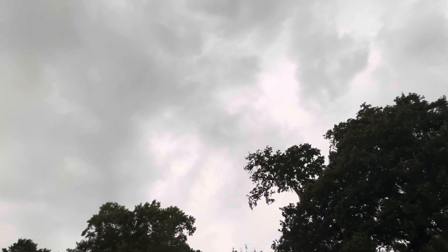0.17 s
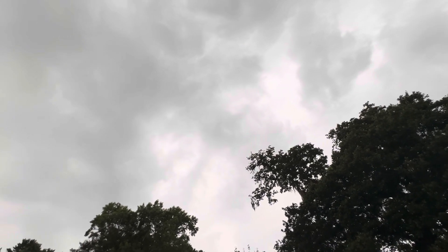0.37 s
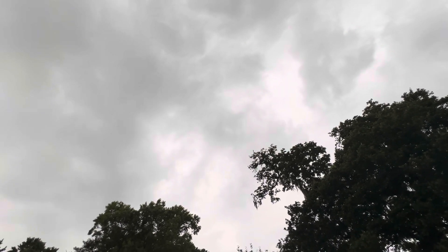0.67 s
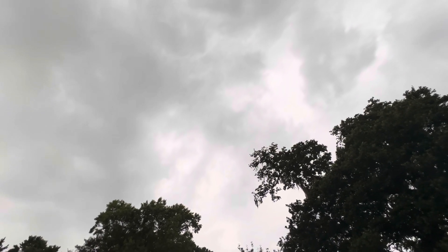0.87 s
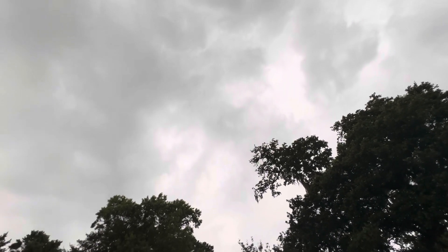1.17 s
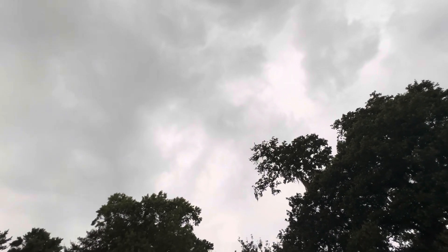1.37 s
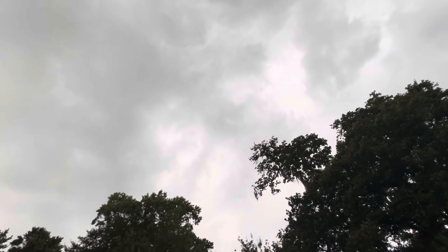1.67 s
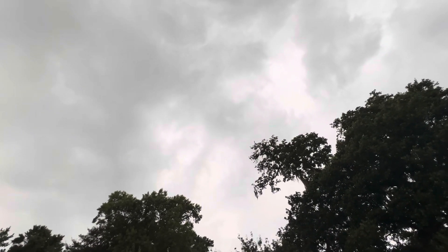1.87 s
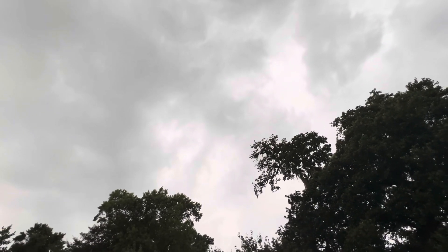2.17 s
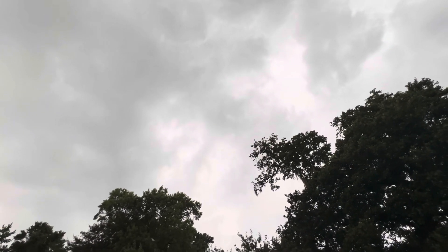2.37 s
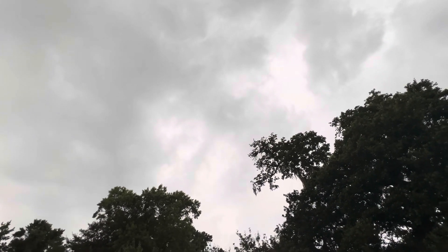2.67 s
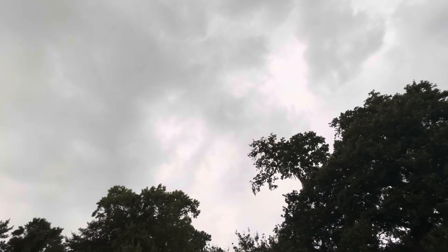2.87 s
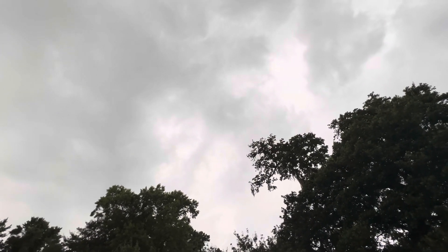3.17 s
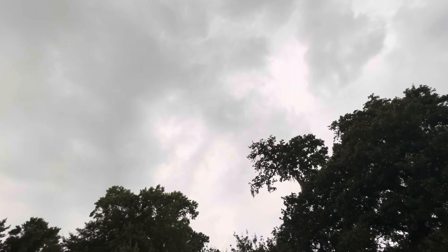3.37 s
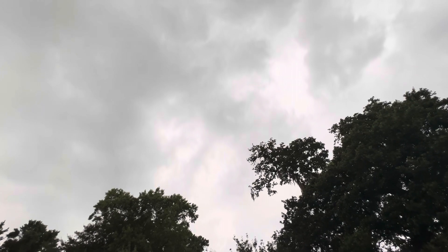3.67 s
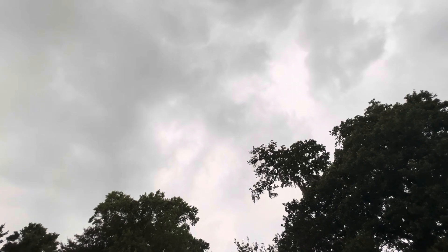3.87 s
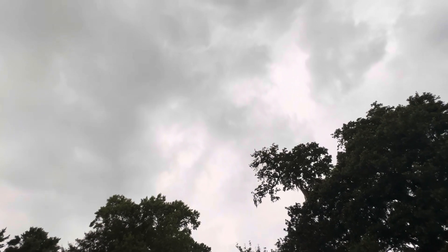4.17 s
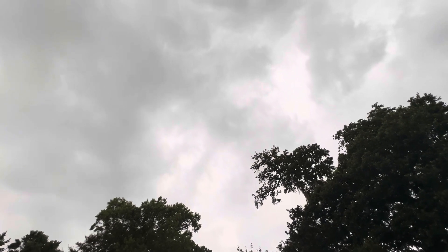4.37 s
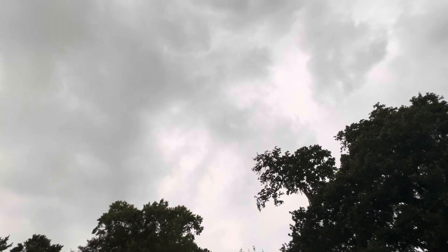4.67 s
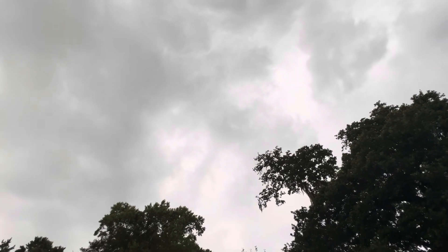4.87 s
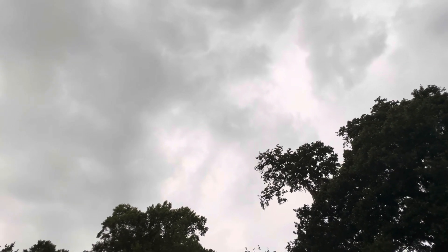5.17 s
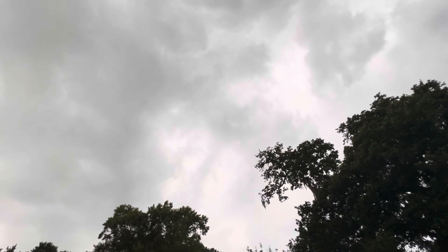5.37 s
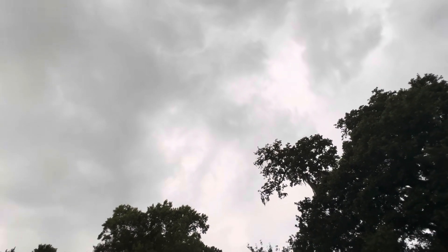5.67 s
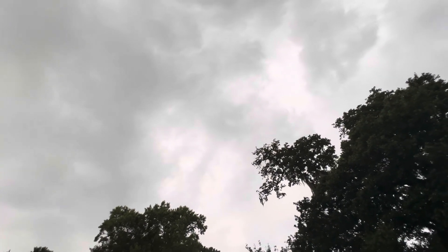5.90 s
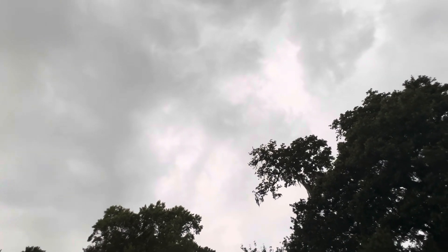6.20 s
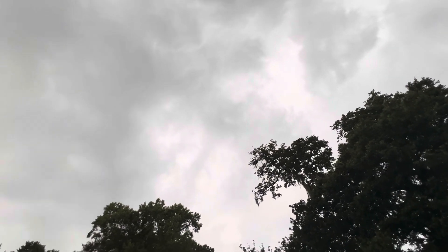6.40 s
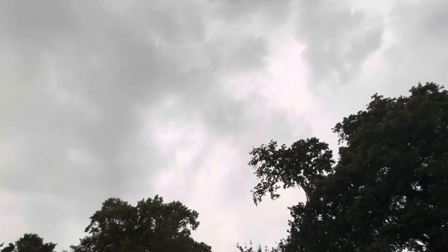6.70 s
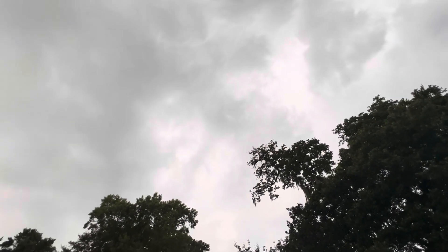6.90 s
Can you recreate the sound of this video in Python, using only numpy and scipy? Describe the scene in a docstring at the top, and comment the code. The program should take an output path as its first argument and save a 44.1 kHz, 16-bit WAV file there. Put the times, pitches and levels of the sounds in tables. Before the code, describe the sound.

Open air among leafy trees under heavy cloud, heard in wide stereo. From 0 s distant thunder rolls, deep and dulled, strongest in the first second, then muttering in overlapping thuds and rising again around 5.9-6.5 s, over a faint low drone and soft leaf wash. Far cicadas hiss steadily, brighter on the right, with two high crickets chirping four or five times a second, drifting in and out of step. Small raindrops tick on leaves throughout, with clear taps at 0.9, 2.9, 3.3, 4.2 and 4.95 s and a crackling cluster at 6.4 s. A thin far whistle swells faintly until about 2.8 s. Bird chips fall at 0.4, 3.9 and 5.7 s. A nearer cicada surges at 2.3, 2.7 and 3.1 s, then from 4.2 s sustains a raspy, sizzling buzz to the end at about 7 s. One soft husky squeak rises at 3.2 s.

```python
"""From the start, distant thunder rolls in overlapping peals, shocks dulled by air, above a low drone and leaf wash.
Far cicadas hiss as merged noise and narrow voices; two crickets chirp by wing strokes, in and out of step.
Raindrops ring the modes of nearby leaves, brief bird chips slur down and a thin far whistle swells.
A nearer cicada, built from overtones of its tymbal clicks, then winds up in three surges and holds its buzz.
Bigger drops scatter in short crackles from its second surge on, and one husky squeak rises soon after."""
import sys
import numpy as np
from scipy import signal
from scipy.fft import rfft, irfft
from scipy.io import wavfile
from scipy.ndimage import uniform_filter1d

SR = 44100
rng = np.random.default_rng(int(sys.argv[2]) if len(sys.argv) > 2 else 0)


def unload_audio(sound):
    """Save the sound as a 16-bit wav file, at the path given as the first command line argument."""
    columns = np.transpose(np.atleast_2d(sound))
    # keep every value between -1 and 1, then stretch to whole-number steps
    steps = np.round(np.clip(columns, -1, 1) * 32767)
    wavfile.write(sys.argv[1], SR, steps.astype(np.int16))


N = 310464
TIME = np.arange(N) / SR
FREQ = np.fft.rfftfreq(N, 1 / SR) + 1e-3  # the offset keeps logarithms finite


def undb(db):
    """Amplitude ratio: 20 dB is a factor of ten."""
    return 10 ** (np.asarray(db) / 20)


def unit(x):
    """Normalisation to an rms amplitude of 1."""
    return x / np.sqrt(np.mean(x ** 2))


def curve(rows, axis=1):
    """Linear interpolation in time of one column of a table."""
    rows = np.asarray(rows)
    return np.interp(TIME, rows[:, 0], rows[:, axis])


def colour(x, points):
    """Spectral shaping by (frequency_hz, gain_db) points, falling steeply outside them."""
    hz, db = np.transpose(points)
    octaves_outside = np.abs(np.log2(FREQ / np.clip(FREQ, hz.min(), hz.max())))
    gain_db = np.interp(np.log(FREQ), np.log(hz), db) - 40 * octaves_outside
    return irfft(rfft(x) * undb(gain_db), N)


def resonate(x, hz, width_hz):
    """Damped resonance with gain 1 at its centre."""
    return signal.lfilter(*signal.iirpeak(hz, hz / width_hz, SR), x)


def walk(rate):
    """Slow random modulation, rms 1: levels held 1 / rate s and smoothed twice."""
    k = int(SR / rate)
    steps = np.repeat(rng.standard_normal(N // k + 1), k)
    return unit(uniform_filter1d(uniform_filter1d(steps, k), k)[:N])


def surround(pair, wide_hz, spread=1.4):
    """Diffuse-field coherence: long waves reach both ears alike, short ones do not."""
    mid, side = rfft(pair)
    ratio = FREQ / wide_hz
    share = ratio ** 2 / np.abs(1 - ratio ** 2 + 1j * ratio / spread)
    both = mid + side * share * np.array([[1], [-1]])
    return irfft(both / np.sqrt(1 + share ** 2), N)


def foliage(x, t60, wet_db):
    """Diffuse reverberation: direct sound and a decaying tail thrown back by trunks and leaves."""
    t = TIME[:SR // 2]
    tail = rng.standard_normal((2, len(t))) * undb(-60 * t / t60)
    tail *= undb(wet_db) / np.sqrt(np.sum(tail ** 2, axis=1, keepdims=True))
    tail[:, 0] += 1  # direct sound
    heard = signal.fftconvolve(x[None], tail, axes=1)[:, :N]
    return heard / np.sqrt(1 + undb(wet_db) ** 2)


def swell(start, rise_s, hold_s, fade_s):
    """Envelope: linear rise, hold, then exponential decay with time constant fade_s."""
    t = TIME - start
    return np.clip(t / rise_s, 0, 1) * np.exp(-np.maximum(t - rise_s - hold_s, 0) / fade_s)


def swells(rows, axis=4):
    """Incoherent addition: overlapping swells add in power, at the levels of one column."""
    return np.sqrt(sum((undb(row[axis]) * swell(*row[:4])) ** 2 for row in rows))


def thunder(claps_per_s=420, scatter_db=0.5, steady_s=0.082, split_hz=105, wide_hz=390, boom_db=0.0, upper_db=0):
    """Delayed arrival: shocks from all along the channel overlap as thuds, dulled by miles of air."""
    # spectrum left by the long path through air: frequency_hz, gain_db
    roll_colour = [(25, -49), (40, -16), (50, -14.5), (62, 0.5), (76, -3), (95, -3.5), (122, -3),
                   (175, -9.5), (205, -9), (300, -20.5), (400, -24), (520, -47)]
    # peals, one for each stretch of the lightning channel:
    # start_s, rise_s, hold_s, fade_s, boom_db, upper_rumble_db
    peals = [(0, 0.023, 0.04, 0.08, -42, -37), (.03, 0.07, 0.26, 0.37, -30.7, -37),
             (.42, 0.022, 0.033, 0.41, -52, -37.5), (.74, 0.043, 0.027, 0.025, -41.5, -39),
             (.9, 0.067, 0.24, .15, -47, -53), (1.29, 0.047, 0.077, 0.23, -44, -42.5),
             (1.53, 0.048, 0.059, 0.17, -41, -41.5), (1.72, 0.035, .1, 0.45, -53, -46),
             (2.18, 0.11, 0.074, 0.095, -45.5, -53), (2.35, 0.36, .4, 0.55, -47, -47.5),
             (3.17, 0.025, 0.074, 0.059, -43, -46.5), (3.31, 0.037, 0.047, 0.032, -51, -43.5),
             (3.51, 0.023, 0.032, 0.14, -40.5, -51), (3.69, 0.04, 0.14, 0.61, -45, -48.5),
             (4.18, 0.067, .08, 0.26, -45.5, -56), (4.85, 0.21, 0.099, 0.071, -49.5, -62),
             (5.84, 0.11, 0.27, 0.39, -41, -47), (6.27, 0.084, 0.036, 0.054, -38, -43),
             (6.42, 0.036, 0.09, 0.13, -39, -49.5)]
    mutter_db = -53  # the far echoes that never quite die between peals
    lurch_db = 1

    arrivals = rng.random((2, N)) < claps_per_s / SR
    strengths = undb(scatter_db * rng.standard_normal((2, N)))
    shocks = arrivals * rng.choice([-1, 1], (2, N)) * strengths
    rumble = surround(colour(shocks, roll_colour), wide_hz)
    # far stretches of the channel send only a boom; nearer ones keep their upper rumble
    boom = irfft(rfft(rumble) / (1 + (FREQ / split_hz) ** 8), N)
    out = 0
    for part, loud, db in ((boom, swells(peals), boom_db), (rumble - boom, swells(peals, axis=5), upper_db)):
        power = uniform_filter1d(np.mean(part ** 2, axis=0), int(steady_s * SR))
        steady = part / np.sqrt(power)
        out = out + steady * np.hypot(loud, undb(mutter_db)) * undb(db + lurch_db * walk(14))
    return out


def drops(push_s=0.0013, leaf_db=7, spatter_db=7, spray_db=8, small_per_s=9, small_db=-61):
    """Impulsive excitation: a drop rings the leaf's modes while water spatters; tiny ones fall between."""
    # drops on leaves, levels before the common gains: start_s, leaf_db, pitch_hz, spatter_db, fine_spray_db
    falls = [(0.1515, -53, 890, -47.5, -53), (0.358, -50.5, 1430, -54, -66),
             (0.66, -49, 1100, -46.5, -46.5), (0.729, -53, 905, -56, -67), (0.883, -33.5, 1564, -46.5, -54),
             (0.887, -37, 1500, -58, -63), (0.889, -42, 640, -58, -68), (1.36, -49, 1340, -57, -54),
             (1.378, -45, 710, -62, -66), (1.629, -53, 1070, -50.5, -66), (2.338, -48, 760, -52, -58),
             (2.901, -48, 1020, -51, -61), (2.906, -47, 617, -50, -65), (2.913, -45, 830, -62, -65),
             (3.019, -51, 1940, -63, -68), (3.286, -44, 900, -53, -66), (3.291, -45, 1750, -43, -55),
             (3.964, -64, 1380, -52, -49), (4.196, -43.5, 1014, -52.5, -53.5),
             (4.198, -45.5, 1610, -58, -62), (4.251, -56, 1620, -51, -52), (4.946, -40.5, 1166, -59, -60),
             (4.953, -45, 900, -65, -64), (5.297, -40.5, 1390, -63, -59), (5.511, -47, 860, -64, -54),
             (5.912, -45.5, 1210, -60, -54), (6.371, -46, 1210, -51, -57),
             (6.4355, -32.5, 1620, -49, -44.5), (6.4405, -40, 1254, -42, -50),
             (6.4435, -37, 1740, -46, -49), (6.449, -40, 1270, -50, -53), (6.463, -40, 1700, -45, -68)]
    # modes of a struck leaf: pitch_multiple, t60_s, level_db
    leaf_modes = [(.42, 0.015, -8), (.78, 0.02, -10.5), (1, 0.017, 2.5), (1.15, 0.022, -9),
                  (1.55, .016, -11.5), (2.1, 0.019, -22)]

    leaves, spatter, spray = np.zeros((3, N + SR))
    t = TIME[:SR // 10]
    draws = rng.random((int(small_per_s * TIME[-1]), 3))
    small = [(when * TIME[-1], small_db + 6 * size, 750 + 1300 * pitch, small_db + 3.0, small_db - 14)
             for when, size, pitch in draws]
    # a sharp snap, then the droplets fly apart
    splash = (np.exp(-t / .0035) + .35 * np.exp(-t / .011)) * (1 - np.exp(-t / .0005))
    for at, db, hz, coarse_db, fine_db in list(falls) + small:
        leaf = np.zeros(len(t))
        for ratio, t60, mode_db in leaf_modes:
            decay = np.exp(-np.log(1000) * t / t60)
            leaf += undb(mode_db) * decay * np.sin(2 * np.pi * (ratio * hz * t + rng.random()))
        span = slice(int(at * SR), int(at * SR) + len(t))
        leaves[span] += undb(db + leaf_db) * leaf * (1 - np.exp(-t / push_s))
        spatter[span] += undb(coarse_db + spatter_db) * splash * rng.standard_normal(len(t))
        spray[span] += undb(fine_db + spray_db) * splash * rng.standard_normal(len(t))
    water = colour(spatter[:N], [(700, -20), (1600, 3.0), (2500, 4.0), (4500, 1.5)])
    water += colour(spray[:N], [(4500, 7.0), (6500, 3), (9000, -10)])
    return foliage(leaves[:N] + water, .07, -6)


def scatters(per_s=1600, scatter_db=4.5, gain_db=0, wet_db=-6):
    """Random impulse train: big drops burst into droplets that crackle through the lower leaves."""
    # bursts of droplets: start_s, rise_s, hold_s, fade_s, level_db
    bursts = [(2.9, 0.007, .015, 0.04, -60), (3.288, 0.0046, .008, 0.022, -51),
              (5.49, .02, 0.018, 0.054, -52.5), (5.66, 0.097, .2, 0.37, -60),
              (6.362, 0.0066, 0.0086, 0.026, -46), (6.434, 0.0026, 0.014, 0.031, -42.5),
              (6.52, 0.026, 0.069, 0.06, -55.5)]
    # spectrum of the crackle: frequency_hz, gain_db
    crackle_colour = [(450, -5.5), (800, -1), (1200, 1), (1700, -2), (2300, -8.5), (3500, -4),
                      (6000, -13.5), (8500, -10.5)]

    arrivals = rng.random(N) < per_s / SR
    droplets = arrivals * rng.choice([-1, 1], N) * undb(scatter_db * rng.standard_normal(N))
    crackle = unit(colour(droplets, crackle_colour)) * swells(bursts)
    return undb(gain_db) * foliage(crackle, 0.76, wet_db)


def cicada(body_db=1.4, body_follow=0.4, ribs_db=1.5, throb=0.11):
    """Source and resonator: tymbal clicks drive the hollow abdomen; effort adds a bright rib sizzle."""
    # tymbal buckling: time_s, click_rate_hz
    tymbal = [(2.4, 146), (2.8, 149.3), (3.3, 148.9), (3.9, 148.8), (4.1, 145.8), (4.45, 145.5),
              (4.75, 144.5), (5.1, 144.6), (5.35, 144.2), (5.9, 144.4), (7, 144.1)]
    # resonance of the hollow abdomen: frequency_hz, gain_db
    abdomen = [(3900, -20), (4170, -9), (4330, -7.5), (4470, -8), (4620, -5), (4770, -5), (4930, -2),
               (5060, -2), (5190, -1), (5360, -4), (5500, -14)]
    # resonance of the tymbal ribs: frequency_hz, gain_db
    ribs = [(7900, -27.5), (9000, 7.5), (9500, 3.5), (9950, 3.5), (10300, 3.5), (10900, -6), (12100, -23),
            (13200, -2.5), (14300, -14), (15000, -7), (15700, -22)]
    # moments when one overtone sings out: start_s, rise_s, hold_s, fade_s, lift_db, overtone_number
    sing_outs = [(2.74, .08, .06, .05, 5, 34), (3.1, .15, .5, .15, 4.5, 28), (3.28, .1, .42, .1, 8.5, 34),
                 (3.38, .12, .33, .08, 7.5, 36), (4.12, .12, .15, .12, 9, 34),
                 (4.18, .12, .15, .12, 5.5, 30), (4.6, .15, .4, .07, 8.5, 32), (5.15, .1, .15, .1, 6.5, 36),
                 (5.6, .08, .12, .08, 6.5, 36), (5.78, .05, .04, .03, 7, 35), (5.7, .3, .9, .2, 4.5, 32),
                 (6.62, .06, .06, .04, 4.5, 35), (6.8, .08, .15, .08, 8.5, 36)]
    # surges, the last sustained, before the body and rib gains: start_s, rise_s, hold_s, fade_s, level_db
    surges = [(2.29, 0.11, .02, 0.14, -55.5), (2.71, 0.12, .03, 0.21, -54.5), (3.1, 0.22, 0.44, 0.6, -54),
              (4.17, 0.32, 3.6, 0.15, -54.5)]
    # wind in the leaves makes overtones fade (dB) and waver (cycles), and the body's buzz flutter (dB)
    fade_db, waver, flutter_db = 2.5, .075, 1.3
    skirt_db = -13  # share of each overtone that the leaves scatter into a rough skirt
    rib_tone_db = -5  # rib overtones relative to the rasp

    rate = curve(tymbal)
    cycles = np.cumsum(rate * (1 + .001 * walk(18))) / SR

    def overtone(order):
        """Multipath propagation: each overtone swells and wavers alone through the moving leaves."""
        phase = 2 * np.pi * (order * cycles + waver * walk(70) + rng.random((2, 1)))
        skirt = (walk(110) * np.sin(phase) + walk(110) * np.cos(phase)) / np.sqrt(2)
        return undb(fade_db * walk(26)) * (np.sin(phase) + undb(skirt_db) * skirt)

    body = np.zeros((2, N))
    for order in range(27, 38):
        ring_db = np.interp(order * rate, *np.transpose(abdomen))
        lift_db = sum(row[4] * swell(*row[:4]) for row in sing_outs if round(row[5]) == order)
        body += undb(ring_db + lift_db) * overtone(order)
    body = unit(body * undb(flutter_db * walk(30)))

    rib_tones = unit(sum(overtone(order)[0] for order in range(66, 72)))
    rasp = rng.standard_normal(N) * (1 + throb * np.cos(2 * np.pi * cycles))
    sizzle = unit(colour(rasp, ribs)) + undb(rib_tone_db) * unit(colour(rib_tones, ribs))
    sizzle = sizzle * undb(1.2 * walk(25))
    # a copy delayed 12 samples spreads the sizzle between left and right
    sizzle = np.array([sizzle, np.roll(sizzle, 12)])

    loud = swells(surges)
    effort = loud / loud.max()
    buzz = undb(body_db) * body * effort ** body_follow
    return loud.max() * (buzz + undb(ribs_db) * sizzle * effort)


def cricket(chirps, hz, stroke_hz, length_s, sag, wet_db, gain_db):
    """Resonant stridulation: wing strokes gate one ringing pitch, which sags as each stroke slows."""
    grass_t60_s = .12  # how long the song lingers in the foliage
    loud, pitch = np.zeros(N), np.full(N, float(hz))
    for (at, db), (tune, shift) in zip(chirps, rng.standard_normal((len(chirps), 2))):
        near = np.abs(TIME - at) < length_s / 2
        t = TIME[near] - at
        stroke = (t * stroke_hz + shift) % 1
        chirp_shape = np.sqrt(np.abs(np.cos(np.pi * t / length_s)))
        loud[near] = undb(db) * np.sin(np.pi * stroke) ** 2 * chirp_shape
        pitch[near] = hz * (1 + 0.00186 * tune - sag * (stroke - .5))
    song = loud * np.sin(2 * np.pi * np.cumsum(pitch * (1 + 0.00396 * walk(500))) / SR)
    return undb(gain_db) * foliage(song, grass_t60_s, wet_db)


def low_cricket():
    """Amplitude-gated tone: the lower wing resonance, chirp by chirp."""
    # chirps, levels before the common gain: centre_s, level_db
    chirps = [(.126, -61), (.319, -60), (.502, -55.5), (.70, -54.5), (.903, -58), (1.143, -58),
              (1.337, -59), (1.513, -60), (1.739, -62), (1.932, -57), (2.139, -56.5), (2.395, -56.5),
              (2.59, -58), (2.80, -55.5), (3.015, -55.5), (3.228, -54.5), (3.438, -53), (3.655, -53.5),
              (3.929, -60), (4.164, -57.5), (4.405, -59), (4.633, -58), (4.889, -61), (5.12, -59),
              (5.346, -57), (5.577, -62), (5.789, -59), (5.985, -60), (6.301, -57), (6.55, -56),
              (6.798, -58)]
    return cricket(chirps, hz=6957, stroke_hz=44.3, length_s=0.0935, sag=0.026, wet_db=-2.5, gain_db=8.5)


def chirp_times(runs, sway_s=0.0073, scatter_db=1.0):
    """Jittered periodicity: an even beat in each run, swaying in time and strength (centre_s, level_db)."""
    beats = [(at, db) for first, end, period, db in runs for at in np.arange(first, end, period)]
    return np.array(beats) + rng.standard_normal((len(beats), 2)) * [sway_s, scatter_db]


def high_cricket():
    """Amplitude-gated tone: the higher wing resonance, in nearly periodic runs of chirps."""
    # runs of chirps: first_chirp_s, end_s, period_s, level_db
    runs = [(.22, .75, 0.2, -55), (.89, 2.15, 0.22, -55.5), (2.39, 3.75, .213, -54.5),
            (3.965, 7.1, 0.23, -55)]
    chirps = chirp_times(runs)
    return cricket(chirps, hz=7350, stroke_hz=41.6, length_s=.12, sag=0.038, wet_db=1, gain_db=0.0)


def chorus(level_db=-52, voices_db=-21.0, lead_hz=5360, lead_db=-16):
    """Incoherent superposition: far cicadas merge into hiss; voices rise and sink, one holds its note."""
    # spectrum of the far cicadas: frequency_hz, gain_db
    chorus_colour = [(3300, -11.5), (4100, -2.5), (4600, 0.5), (5150, 4), (5400, -0.5), (5700, -5),
                     (7700, -11.5), (8800, -8), (9400, -13.5), (10400, -4), (11200, -11.5), (12200, -72),
                     (13800, -26), (15500, -27)]

    hiss = unit(colour(rng.standard_normal((2, N)), chorus_colour))
    for hz in np.linspace(4450, 5350, 7):
        voice = unit(resonate(resonate(rng.standard_normal((2, N)), hz, 65), hz, 65))
        hiss = hiss + voice * undb(voices_db + 4 * walk(12))
    lead_cycles = np.cumsum(lead_hz + 10 * walk(60)) / SR
    lead = np.sin(2 * np.pi * (lead_cycles + rng.random((2, 1))))
    hiss = hiss + lead * undb(lead_db + 2.1 * walk(3.2))
    return hiss * undb(level_db + 0.91 * walk(0.8) + .5 * walk(25.07))


def far_crickets(level_db=-63):
    """Narrow-band noise: more crickets further off blur into a trembling band."""
    band_colour = [(6600, -31), (6950, -15.0), (7150, 12.0), (7450, 7.0), (7650, -18.0)]
    band = colour(rng.standard_normal((2, N)), band_colour)
    return unit(band) * undb(level_db + 2.0 * walk(11))


def birds():
    """Frequency glide: each chip is a brief husky note that slurs down and fades among the trees."""
    # chip notes, levels before a common gain:
    # start_s, final_pitch_hz, downward_slur_hz, huskiness (fraction of pitch), level_db, fade_s
    chips = [(.400, 6500, 500, .035, -47.5, 0.028), (3.915, 6000, 200, .03, -52, 0.04),
             (5.718, 2900, 450, .025, -45, 0.011)]
    slur_s = 0.0042  # how quickly a chip drops to its final pitch

    song = np.zeros(N)
    for at, hz, slur_hz, husk, db, fade_s in chips:
        t = np.maximum(TIME - at, 0)
        pitch = (hz + slur_hz * np.exp(-t / slur_s)) * (1 + husk * walk(1500))
        note = np.sin(2 * np.pi * np.cumsum(pitch) / SR)
        song += undb(db + 2.5) * note * (1 - np.exp(-t / 0.0016)) * np.exp(-t / fade_s)
    return foliage(song, 0.16, -1)


def squeak(start_s=3.222, length_s=0.067, from_hz=1570, to_hz=1720, level_db=-56, rough=0.028):
    """Frequency modulation: one soft squeak glides up, random pitch shifts making it slightly husky."""
    along = np.clip((TIME - start_s) / length_s, 0, 1)
    pitch = (from_hz + (to_hz - from_hz) * along ** 2) * (1 + rough * walk(400))
    tone = np.sqrt(np.abs(np.sin(np.pi * along))) * np.sin(2 * np.pi * np.cumsum(pitch) / SR)
    return undb(level_db) * foliage(tone, 0.25, -13)


def whistle(hz=1959, gain_db=-4, waver_db=-0.5):
    """Amplitude modulation: a thin, faint, nearly pure tone comes and goes far away."""
    # swells, levels before the common gain: start_s, rise_s, hold_s, fade_s, level_db
    rises = [(-.05, .05, .15, 0.2, -64), (.5, 0.13, 0.24, .08, -61.5), (1.82, 0.11, 0.044, 0.11, -62),
             (2.45, 0.068, 0.22, 0.085, -61.5)]
    floor_db = -68.5  # between swells, before the common gain
    loud = np.hypot(swells(rises), undb(floor_db + waver_db * walk(3.7)))
    return np.sin(2 * np.pi * np.cumsum(hz + 4 * walk(25.07)) / SR) * loud * undb(gain_db)


def drone(hz=57, width_hz=9, level_db=-53):
    """Resonant filtering: twice-resonated noise makes a faint, unsteady low drone under the thunder."""
    tone = resonate(resonate(rng.standard_normal(N), hz, width_hz), hz, width_hz)
    return unit(tone) * undb(level_db)


def air(level_db=-52.0):
    """Broadband diffuse noise: the soft wash of leaves and far country."""
    # spectrum of open air and foliage: frequency_hz, gain_db
    air_colour = [(45, 10), (62, -6), (90, 0), (200, 8), (330, 4), (500, 2.5), (800, -0.5), (1150, -0.5),
                  (1700, -3), (2400, -6.5), (3500, -8.5), (6300, -27.5), (7900, -34), (11000, -26.5)]
    wash = surround(colour(rng.standard_normal((2, N)), air_colour), 503)
    return unit(wash) * undb(level_db + .25 * walk(1.9) + .9 * walk(14))


def scene():
    """Superposition: thunder from a little to the left, with air, insects, birds and drops."""
    left, right = thunder()
    storm = np.array([left, np.pad(right, (10, 0))[:N]])  # 10 samples later on the right
    low, high = low_cricket(), high_cricket()
    weather = storm + drone() + air()
    insects = chorus() + cicada() + low + high + far_crickets()
    rain = drops() + scatters()
    return weather + insects + rain + squeak() + birds() + whistle()


def record(dry):
    """Interchannel level difference: the right hears more upper middle range; the top is cut."""
    # the two microphones: frequency_hz, left_minus_right_db
    ears = [(60, 1), (110, 1.5), (200, 1), (380, -0.5), (700, 1), (1290, -4), (2380, -2.5), (4400, -12),
            (8120, -3.5), (15000, 2.5)]
    top_hz = 15500
    hz, db = np.transpose(ears)
    tilt_db = np.interp(np.log(FREQ), np.log(hz), db) * np.array([[.5], [-.5]])
    mean_power = np.mean(undb(tilt_db) ** 2, axis=0)
    heard = irfft(rfft(dry) * undb(tilt_db) / np.sqrt(mean_power), N)
    return signal.sosfilt(signal.ellip(8, .2, 70, top_hz, fs=SR, output="sos"), heard)


dry = scene()
out = record(dry)
unload_audio(out)
```